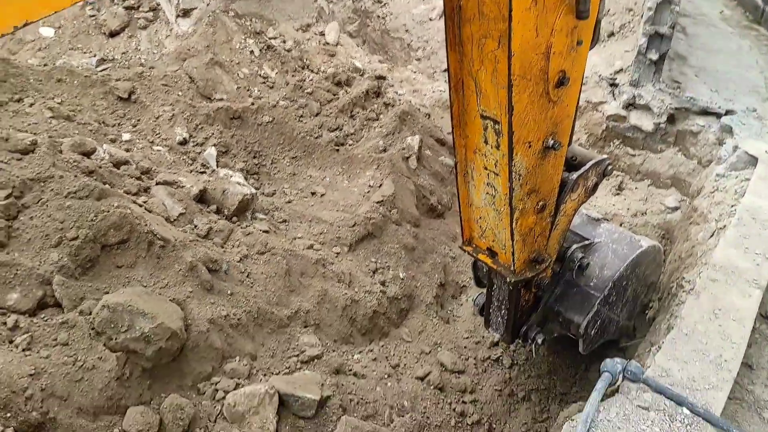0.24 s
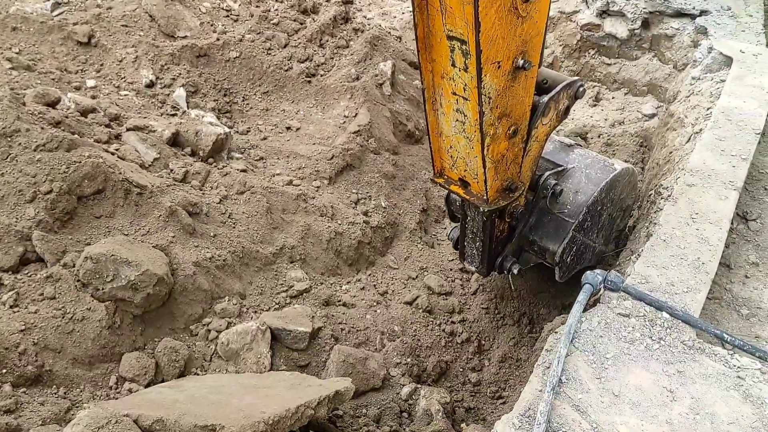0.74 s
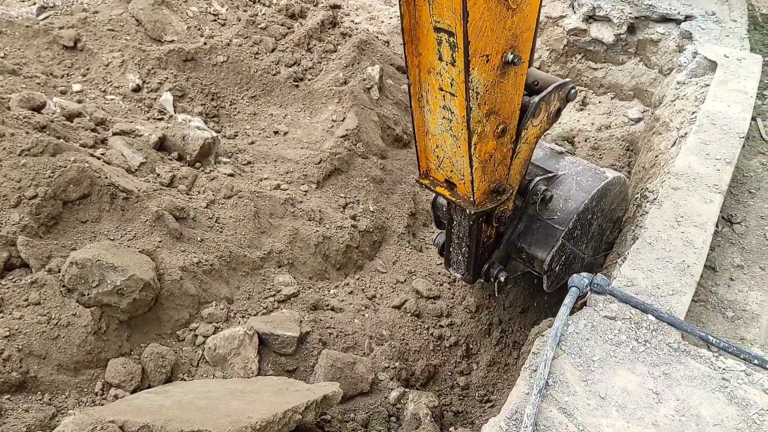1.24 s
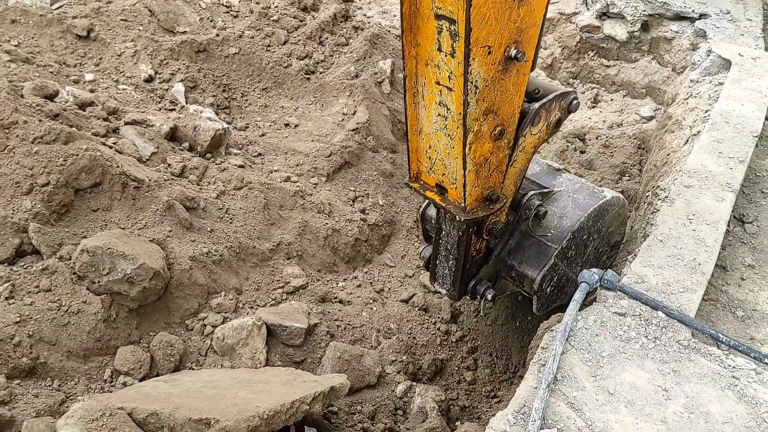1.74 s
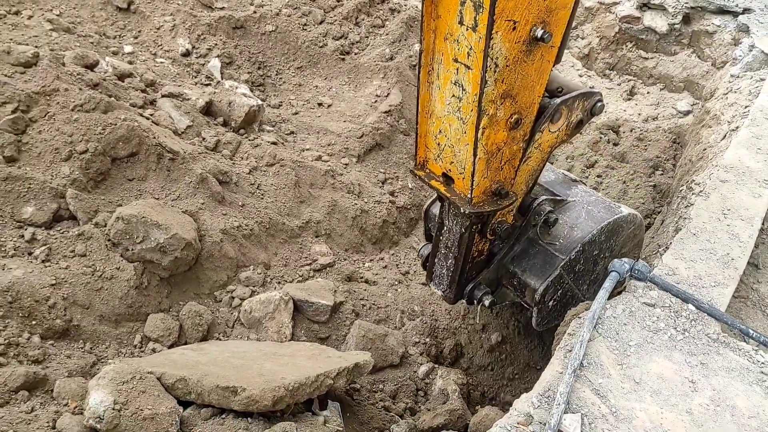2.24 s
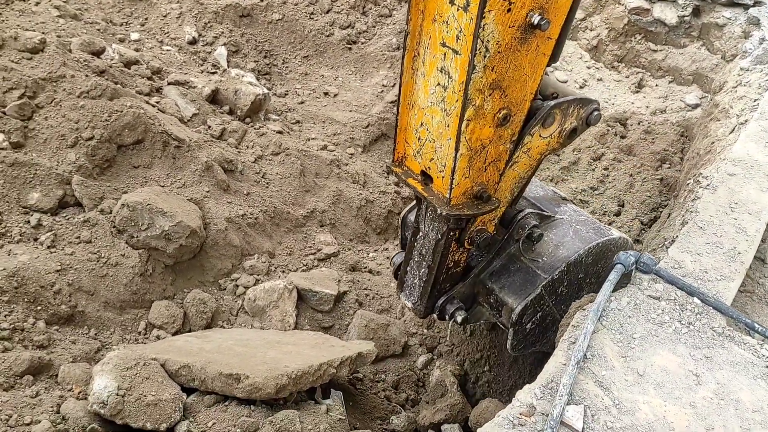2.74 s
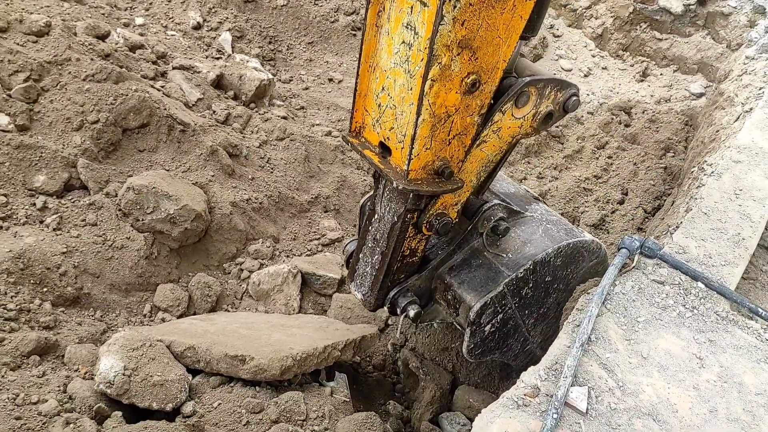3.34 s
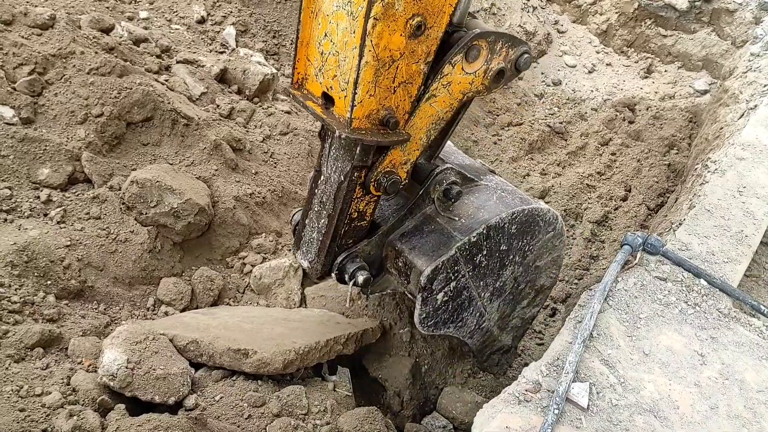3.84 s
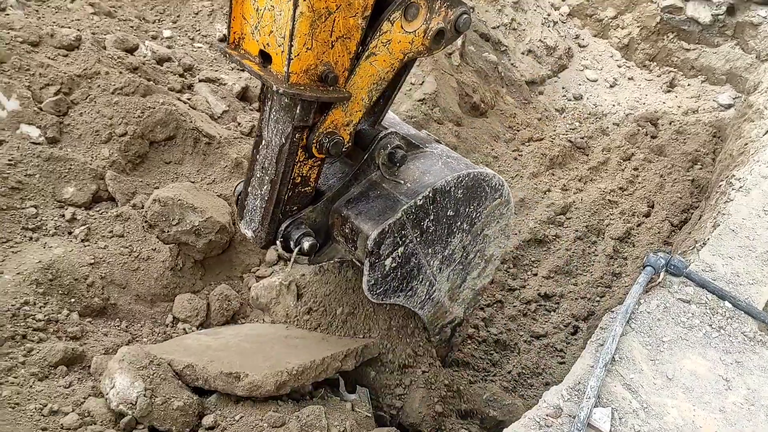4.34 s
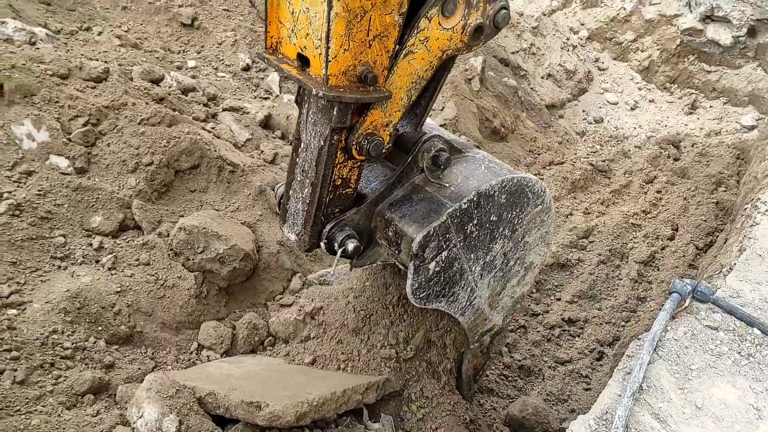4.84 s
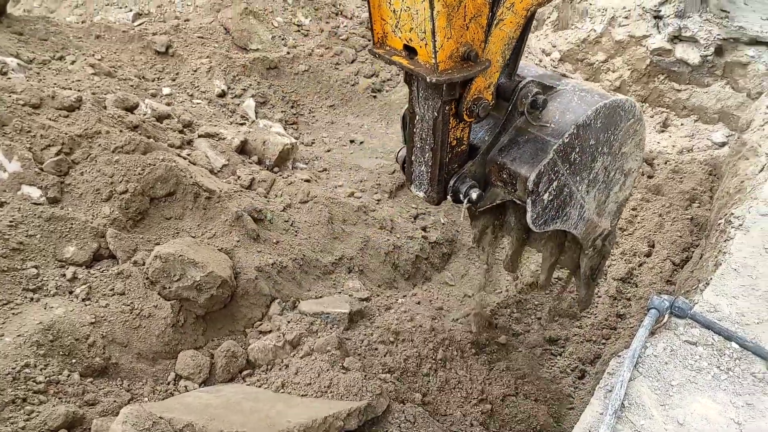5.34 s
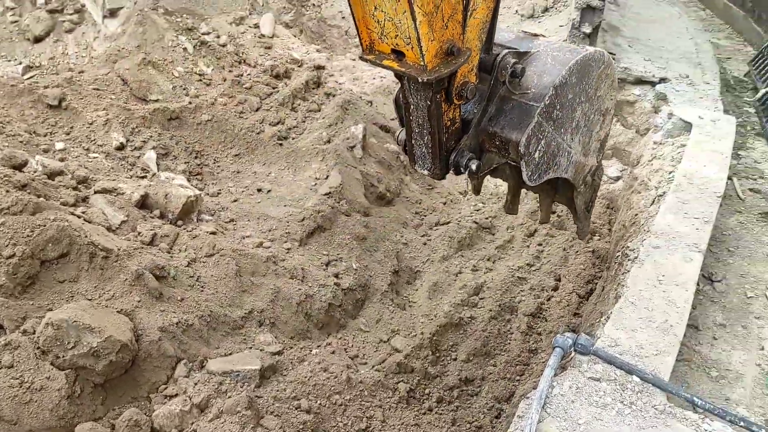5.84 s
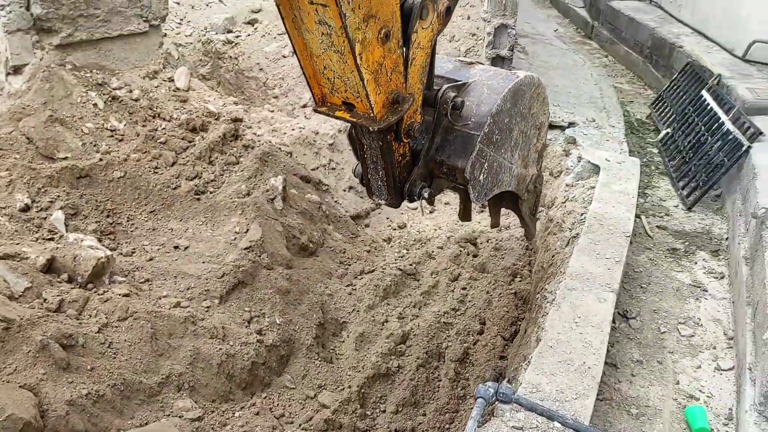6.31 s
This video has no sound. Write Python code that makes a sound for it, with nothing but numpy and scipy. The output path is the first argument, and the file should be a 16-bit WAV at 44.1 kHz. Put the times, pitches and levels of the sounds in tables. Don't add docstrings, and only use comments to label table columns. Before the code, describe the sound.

A diesel engine runs throughout, a low throbbing hum with an uneven exhaust beat, rushing roar and faint fan whistle, heard close in stereo outdoors. From 0 to 1 s the bucket scrapes softly, with soil slumping and small stones ticking while the engine labours. After a brief oil hiss near 1.1 s, engine speed climbs and from 1.5 s a pump whine emerges, swelling about twice a second. Soft thuds and a crunch fall at 1.7-1.9 s; dragging and steel knocks thicken from 2.4 to 3.6 s. A hard rock bang lands at 3.8 s. Between 4.6 and 5.1 s comes the heaviest tumble: ringing cracks, pouring gravel, deep thuds and a boom, loudest near 4.85 s. Knocks thin by 5.4 s, leaving engine, whine and rising hiss from 5.9 s. Bright clanks at 6.15 s and a sharp clang with low booms at 6.5 s close it.

```python
import sys
import numpy as np
from scipy import signal
from scipy.io import wavfile
from scipy.ndimage import uniform_filter1d

SR = 44100
rng = np.random.default_rng(int(sys.argv[2]) if len(sys.argv) > 2 else 0)


def store_wav(level_fs):
    pcm = np.round(np.clip(np.atleast_2d(level_fs), -1, 1) * 32767)
    wavfile.write(sys.argv[1], SR, pcm.T.astype(np.int16))


def invert_db(level):
    return 10 ** (np.asarray(level, dtype=float) / 20)


N = 289737
SIDES = np.array([[1], [-1]])
ENGINE_LAG = 9

# (f/Hz, width/Hz, level/dB)
PLATES = [(1440, 173, -1), (1846, 80, 0.5), (1996, 97, -2), (2158, 60, -1), (2360, 170, 0.5),
          (2790, 160, 0), (3078, 70, -7), (3730, 220, -9), (4026, 70, -4), (4325, 87, -7), (6950, 50, -6.5),
          (6350, 55, -23), (7930, 81, -2.5)]
# (f/Hz, likeness/0-1)
DIRECT = [(100, 1), (300, 1), (700, 0.45), (1200, 0.44), (2500, 0.3), (8000, 0.09)]


def rms_one(x):
    return x / np.sqrt(np.mean(x ** 2) + 1e-20)


def in_time(rows):
    s, *columns = np.transpose(rows)
    return [np.interp(np.arange(N) / SR, s, c) for c in columns]


def at_hz(points, hz):
    table_hz, value = np.array(points)[:, 0], np.array(points)[:, 1]
    return np.interp(np.log(hz), np.log(table_hz), value)


def drift(rate):
    r = np.exp(-80 * np.pi * rate / SR)
    noise = rng.standard_normal(N // 40 + 2002)
    slow = signal.lfilter([1], [1, -2 * r, r * r], noise)[2000:]
    return np.interp(np.arange(N) / 40, np.arange(len(slow)), np.clip(rms_one(slow), -3, 2))


def ring(clicks, hz, t60):
    r = invert_db(-60 / (max(t60, .005) * SR))
    w = 2 * np.pi * hz / SR
    return signal.lfilter([0, np.sin(w)], [1, -2 * r * np.cos(w), r * r], clicks + 1e-18)


def grains(per_s, spread_db):
    chance = rng.random((4, N)) * SR / per_s
    out, hit = np.zeros((4, N)), chance < 1
    size = chance[hit]
    sign = np.where(np.arange(hit.sum()) % 3 % 2, 1, -1) * rng.choice([-1, 1], hit.sum())
    out[hit] = sign * invert_db(spread_db * np.minimum(-np.log(size + 1e-9), 3))
    return rms_one(out).reshape(2, 2, N) + 1e-18


def ports(mid, side, alike, hz):
    # (f/Hz, level/dB)
    left_louder = [(40, 0), (200, 1.5), (700, 3), (2500, 3), (6000, 5.5), (9000, -4), (13000, -9)]
    alike = np.clip(alike, 0, 1)
    tilt = invert_db(at_hz(left_louder, hz) / 2 * SIDES)
    return tilt * (np.sqrt(1 + alike) * mid + np.sqrt(1 - alike) * side * SIDES)


def colour(streams, spectrum, likeness, patchy_db, patch_rate):
    out, together = 0, drift(patch_rate / 4)
    lowest, highest = spectrum[0][0], spectrum[-1][0]
    edges = lowest * 2 ** np.arange(0, np.log2(highest / lowest) + .01, .4)
    for k, (low, high) in enumerate(zip(edges, edges[1:])):
        band = signal.butter(2, [low, high], "band", fs=SR, output="sos")
        mid, side = signal.sosfilt(band, streams[k % 2])
        hz = np.sqrt(low * high)
        gain = invert_db(at_hz(spectrum, hz) + patchy_db * (0.49 * together + drift(patch_rate)))
        out = out + gain * ports(mid, side, at_hz(likeness, hz), hz)
    return rms_one(out)


def lagged(x, count):
    return np.array([np.r_[np.zeros(count), x[0, :N - count]], x[1]])


def governor():
    # (t/s, firings per second/Hz)
    set_point = [(0.0, 34.1), (0.45, 33.9), (0.7, 34.44), (0.9, 34.46), (1.5, 35.55), (1.8, 36.94),
                 (3.2, 36.87), (4.2, 36.61), (6.57, 36.66)]
    surges = [1.36, 1.861, 2.35, 2.87, 3.34, 3.86, 4.34, 4.85, 5.39, 5.98, 6.47, 6.97]
    t = np.arange(N) / SR
    hunt = 2 * np.pi * np.interp(t, surges, np.arange(len(surges)))
    pump = np.clip((t - 1.5) / .14, 0, 1)
    firing_hz = in_time(set_point)[0] + 0.34 * pump * np.cos(hunt)
    idle_db, working_db = -43.5, -31
    whine_db = idle_db + pump * (working_db - idle_db + 2 * np.cos(hunt + 0.28))
    hum_db = -31 + 2.5 * pump * (np.cos(hunt + 0.25) - .3)
    return firing_hz, whine_db, hum_db


def engine():
    # (multiple of half the firing rate, level/dB)
    pattern = [(1, -33), (2, -8), (3, -46), (4, -10.5), (5, -43), (6, -18), (7, -49), (8, -9.5), (9, -7.5),
               (10, -26), (11, -11.5), (12, 0), (13, -7), (14, -10), (15, -22), (16, -20), (17, -26),
               (18, -21), (19, -10.5), (20, -16), (21, -42), (22, -21), (23, -46), (24, -9), (25, -20),
               (26, -22), (30, -19), (35, -13)]
    # (t/s, share/0-1)
    labour = [(0.0, 0.2), (0.25, 0.5), (0.55, 0.85), (0.64, 0.97), (0.73, 0.0), (.84, 0.6), (1.0, 0.89),
              (1.5, 0.92), (1.75, 0.14), (2.0, 0.01), (6.57, 0.0)]
    # (multiple of half the firing rate, free level/dB, labouring level/dB)
    labour_tones = [(2, -37, -30.5), (6, -49.5, -31)]
    # (f/Hz, level per Hz/dB)
    roar_spectrum = [(40, -26), (90, -25.5), (150, -15.5), (230, -9.5), (330, -15.5), (500, -19.5),
                     (800, -22), (1300, -21.5), (2500, -24), (4000, -43), (5500, -31.5), (8000, -29),
                     (9500, -71), (15000, -44)]
    # (f/Hz, likeness/0-1)
    diffuse = [(60, 0.93), (130, 1), (290, 0.99), (640, 0.45), (1200, 0.56), (2500, 0.021), (8000, 0.023)]
    firing_hz, whine_db, hum_db = governor()
    firing_phase = 2 * np.pi * np.cumsum(firing_hz) / SR
    lug, = in_time(labour)
    loaded = {round(k): free_db + lug * (lug_db - free_db) for k, free_db, lug_db in labour_tones}
    loaded[12] = hum_db + 2.5 * np.cos(firing_phase / 4 + 1.3)
    out = 0
    for multiple, level_db in pattern:
        waver = min(multiple / 9.9, 1) * (.45 if multiple % 12 == 0 else 1)
        level_db = loaded.get(multiple, -34 + level_db) + 2.43 * waver * drift(6.3)
        phase = multiple / 2 * firing_phase + rng.uniform(0, 2 * np.pi) + 0.44 * waver * drift(2.25)
        out = out + np.sqrt(2) * invert_db(level_db) * np.sin(phase) * ports(1, 0, 0, multiple * 18)
    whine = np.sin(24 * firing_phase + 0.28 * drift(6.0) + [[-.9], [0]]) * invert_db(whine_db + 1.6 * drift(4.0))
    whine = np.sqrt(2) * whine * invert_db([[2.0], [-1.5]])
    firing = invert_db(0.51 * np.cos(2 * firing_phase) + 0.94 * np.cos(firing_phase / 2))
    noise = rng.standard_normal((2, 2, N))
    roar = colour(noise, roar_spectrum, diffuse, patchy_db=2.0, patch_rate=10.0)
    return lagged(out + whine + invert_db(-29.5) * firing * roar, ENGINE_LAG)


def exhaust():
    cylinder_db = [2.5, -11, -9, -9.5]
    # (f/Hz, level/dB, t60/s)
    pipe = [(227, -2, 0.029), (275, -2, 0.042), (422, -12, 0.027)]
    start = 2.9
    firing = np.floor(np.cumsum(governor()[0]) / SR - start).astype(int)
    at = np.flatnonzero(np.diff(firing))
    beat_db = np.array(cylinder_db)[firing[at + 1] % len(cylinder_db)]
    clicks = np.zeros(N)
    clicks[at] = invert_db(-21 + beat_db + 3 * drift(32.0)[at])
    high_pass = signal.butter(2, 176, "high", fs=SR, output="sos")
    clicks = signal.sosfilt(high_pass, clicks + 1e-18)
    out = sum(invert_db(db) * ring(clicks, hz, t60) * ports(1.0, 0, 0, hz) for hz, db, t60 in pipe)
    return lagged(out, ENGINE_LAG)


def valves(gravel_db):
    # (t/s, level/dB)
    valve_hiss = [(0, -59), (.8, -63), (1.1, -52), (1.4, -61), (1.7, -68), (3, -67), (5.3, -62), (5.6, -63),
                  (5.9, -50), (6.57, -49)]
    band = signal.butter(2, [10800, 15600], "band", fs=SR, output="sos")
    mid, side = rms_one(signal.sosfilt(band, rng.standard_normal((2, N))))
    oil = invert_db(in_time(valve_hiss)[0] + 1.7 * drift(4.4))
    sand = invert_db(gravel_db - 36)
    hiss = np.hypot(oil, sand) * (mid + 0.95 * side * SIDES)
    shroud_hz, shroud_t60 = 5690, 0.0086
    fan = ring(rng.standard_normal((2, N)), shroud_hz, shroud_t60)
    fan = rms_one(ring(fan, shroud_hz, shroud_t60))
    return hiss + invert_db(-45 + 1.2 * drift(2.5)) * fan


def strokes(start, length, level_db, lead_db, rise_db, fall_db, tail_db, settle_db, rest_db):
    t = np.arange(0, N + 32, 32)[:, None] / SR
    early, late = np.maximum(start - t, 0), np.maximum(t - start - length, 0)
    before = (lead_db - rise_db * early) * (early > 0)
    after = invert_db(-2 * fall_db * late) + invert_db(2 * (tail_db - settle_db * late))
    power = invert_db(2 * (level_db + before)) * after
    total_db = 10 * np.log10(power.sum(axis=1) + invert_db(2 * rest_db))
    return np.interp(np.arange(N) / SR, t[:, 0], total_db)


def sliding(soil_db, gravel_db):
    # (f/Hz, level per Hz/dB)
    soil_spectrum = [(80, -26), (160, -1.5), (400, -1.5), (750, -4), (1200, -2.5), (2000, -16), (3500, -20),
                     (6000, -82)]
    gravel_spectrum = [(1200, -36), (2500, 0.5), (4800, -11.5), (6000, 5), (8000, 4), (8700, 0),
                       (9600, -33), (15000, -32)]
    coarse = grains(2000 * invert_db(2.5 * drift(30.0)), spread_db=2.5)
    soil = colour(coarse, soil_spectrum, DIRECT, patchy_db=3.0, patch_rate=24.5)
    fine = grains(12000 * invert_db(2.1 * drift(45.0)), spread_db=1.5)
    gravel = colour(fine, gravel_spectrum, DIRECT, patchy_db=2.0, patch_rate=14.0)
    return invert_db(soil_db) * soil + invert_db(gravel_db + 0.5) * gravel


def grating(level_db):
    slips, out = grains(3500 * invert_db(3.5 * drift(40.0)), spread_db=1.5), 0
    for k, (hz, width_hz, mode_db) in enumerate(PLATES):
        mid, side = ring(slips[k % 2], hz, np.log(1000) / np.pi / width_hz)
        gain = invert_db(mode_db + 2.3 * drift(12.0)) * np.sqrt(width_hz)
        out = out + gain * ports(mid, side, at_hz(DIRECT, hz), hz)
    return invert_db(level_db - 3) * rms_one(out)


def struck(times, level_db, modes, chatter_s, port_db=2.2):
    out, count = np.zeros((2, N)), len(times)
    for hz, mode_db, t60 in modes:
        delays = rng.random((count, 3)) * [0, 1, 1] * chatter_s
        sizes = rng.normal(0, 1.84, (count, 3)) - [0, 4.0, 8.0]
        at = np.minimum(((times[:, None] + delays) * SR).astype(int), N - 1)
        uneven = rng.normal(0, port_db, (2, count, 1))
        clicks = np.zeros((2, N))
        clicks[:, at] = invert_db(level_db[:, :, None] + mode_db + sizes + uneven)
        out += ring(clicks, hz, t60)
    return out


def pings():
    # (t/s, peak level/dB, f/Hz, t60/s)
    short_notes = [(0.162, -17.5, 395, 0.059), (0.44, -26, 680, 0.063), (0.469, -25, 666, .07),
                   (0.545, -17.5, 684, 0.072), (0.58, -17.5, 404, 0.085), (0.645, -18, 800, 0.065),
                   (0.699, -22.5, 346, 0.089), (1.4, -10, 1155, 0.045), (2.2, -20, 1190, .04),
                   (1.88, -23, 1830, .03), (3.835, -9, 430, 0.046), (3.836, -15, 1490, 0.029),
                   (5.9, -14, 1540, .05), (4.2, -11.5, 1400, .04), (4.598, -6.5, 3000, 0.036),
                   (4.602, -14, 1930, 0.044), (4.2, -15, 603, 0.031), (5.2, -16.5, 2020, 0.07),
                   (5.05, -15.5, 2150, 0.076), (6.4733, -10.5, 3780, 0.021), (7.4, -14, 1350, .04),
                   (6.484, -5, 2930, 0.054), (6.484, -19, 2700, 0.03), (6.486, -22, 4310, 0.057),
                   (4.812, -11.5, 7700, 0.12), (4.83, -14, 7000, .08), (4.648, -23, 2900, .06),
                   (3.516, -21, 2000, 0.03), (1.6, -23, 4060, .04), (5.0, -21, 2000, 0.05),
                   (4.7, -19, 1900, .04), (4.855, -13.5, 135, 0.19), (4.62, -12, 182, 0.12),
                   (4.4, -17, 1100, .06), (4.863, -12, 2400, .05), (4.599, -17.5, 4500, 0.027),
                   (4.852, -13, 6900, .03), (6.476, -24, 6500, .03), (5.055, -19.5, 3600, 0.076),
                   (0.19, -16.5, 404, .05), (0.205, -22, 300, .06), (1.4, -14, 410, 0.035),
             (1.861, -13, 310, .06), (1.885, -16, 730, .04), (1.886, -17, 350, 0.045),
             (1.7, -12.5, 390, .06), (1.92, -21, 240, 0.068), (1.5, -19, 310, .05), (2.124, -20, 280, .06),
             (2.47, -18.5, 300, 0.066), (2.51, -20, 436, 0.068), (3.864, -9, 514, 0.059),
             (3.875, -16, 290, .06), (4.645, -14, 225, .08), (4.738, -16, 200, 0.07),
             (5.2, -14, 210, 0.091), (4.80, -17, 188, 0.077), (4.875, -9, 257, 0.054),
             (4.888, -16, 640, .04), (4.805, -28, 10400, .1), (4.81, -32, 13900, .1),
             (4.84, -36, 13000, .06), (6.153, -16, 2210, .04), (6.8, -22, 8000, .02),
             (3.835, -9, 6500, .025), (3.60, -16.5, 2250, 0.047), (3.2, -20.5, 2400, .04),
             (6.49, -34, 15000, .15), (4.767, -16, 890, 0.058), (4.844, -4, 300, .05),
             (4.596, -12, 2050, .03), (6.474, -12, 2250, .03), (6.474, -14, 900, .03),
             (5.25, -17, 150, .15), (1.955, -19, 960, .05)]
    out = np.zeros((2, N))
    for s, db, hz, t60 in short_notes:
        level_db = db + 1.2 * SIDES
        out += struck(np.array([s]), level_db, [(hz, 0, t60)], chatter_s=0.004, port_db=1.5)
    return out


def thuds():
    # (t/s, peak level/dB, main f/Hz, t60/s)
    rocks = [
        (1.686, -16, 260, 0.07),
        (1.838, -14, 340, 0.08),
        (3.8345, -3.5, 520, 0.063),
        (4.621, -4, 240, 0.08),
        (4.752, -8.5, 167.9, 0.4),
        (4.842, -1.5, 284.6, 0.09),
        (4.899, -18, 273, 0.2),
        (5.059, -12.5, 211, 0.094),
        (6.483, -11, 198.5, 0.15),
        (6.553, -13, 199, 0.15),
    ]
    # (f/Hz, level/dB, t60/s)
    belly = [(113, -42, 0.17), (155, -11, 0.39), (299, 3, 0.17), (469, -3, 0.16), (560, -21, 0.065),
             (830, -20, .08)]
    s, peak_db = np.transpose(rocks)[:2]
    level_db = peak_db + 1.1 * SIDES
    out = struck(s, level_db - 17.5, belly, chatter_s=0.021)
    for k, (_, _, hz, t60) in enumerate(rocks):
        out += struck(s[k:k + 1], level_db[:, k:k + 1] - 10.5, [(hz, 0, t60)], chatter_s=0.0118)
    return out


def knocks():
    # (t/s, peak level/dB, dull part relative level/dB, left minus right/dB)
    blows = [(0.437, -24, 5, 0), (0.546, -30, 8, 3), (0.637, -24, -7, -2), (0.942, -24, 7, -2),
             (1.688, -33, 6, 14), (1.8352, -17, -14, -4), (1.8796, -18, -6, -2), (2.4316, -17, 2, 9),
             (2.9312, -11, -6, 1), (3.0708, -11, -9, -1), (3.1837, -22, -4, 13), (3.2794, -11.5, -14, 2),
             (3.3335, -11.5, -5, 2), (3.4139, -15, -7, 0), (3.5174, -14, -20, 3), (3.5955, -6, -15, -1),
             (3.8345, -6, -10, 4), (3.8591, -8.5, 1, -5), (4.3355, -21, -6, 2), (4.571, -7, -18, 4),
             (4.5963, -2.5, -10, 6.5), (4.8539, -6, -14, -8), (4.8625, -5, -13, 3), (5.03, -17, -13, 3),
             (5.1243, -10.5, -1, 2), (5.19, -9, -11, 2), (5.3418, -9.5, -19, 7), (6.152, -4, -29, 5.5),
             (6.2088, -8, -17, 6), (6.4738, 1, -17, 16), (6.4844, -6, -14, -5)]
    # (f/Hz, level/dB, t60/s)
    snap_modes = [(1177, 0, 0.015), (2250, 1, 0.013), (3830, -2, 0.012)]
    dull_modes = [(717, 3.5, 0.055), (1171, 2, 0.094), (1480, -1, 0.075)]
    s, peak_db, dull_db, pan_db = np.transpose(blows)
    level_db = peak_db + pan_db / 2 * SIDES
    steel_modes = [(hz, mode_db, 4.4 / width_hz) for hz, width_hz, mode_db in PLATES]
    crack_modes = [(hz, .1, .03) for hz in (5740, 6550, 7640, 7800, 8400)]
    steel = struck(s, level_db - 23.0, steel_modes, chatter_s=.008)
    crack = struck(s, level_db - 27, crack_modes, chatter_s=0.0089)
    snap = struck(s, level_db - 14.5, snap_modes, chatter_s=0.0028)
    dull = struck(s, level_db + dull_db - 14.5, dull_modes, chatter_s=0.031)
    return steel + crack + snap + dull


def scene():
    # (t/s, length/s, gravel level/dB, steel relative level/dB)
    scrapes = [(0.135, 0.08, -25, 2), (0.303, 0.22, -41, 10), (.53, 0.029, -37, 9),
               (0.617, 0.078, -37, 12.5), (0.927, 0.062, -38, 10), (1.832, 0.067, -24.5, 0),
               (2.25, 0.13, -38.5, 8), (2.427, 0.094, -29.5, 6.5), (2.712, 0.029, -40, 12),
               (2.924, 0.15, -31, 8.5), (3.181, 0.014, -27.5, 2), (3.277, 0.051, -37, 9.5),
               (3.525, 0.14, -25.5, 6), (3.705, 0.093, -22, 0.5), (3.833, 0.028, -19, 4.5),
               (4.198, 0.13, -27.5, 7), (4.51, 0.055, -31, 5), (4.592, 0.011, -26, 17),
               (4.64, 0.05, -19.5, -8), (4.751, 0.047, -24.5, 9), (4.812, 0.017, -13.5, -18),
               (4.841, 0.02, -16, 4.5), (4.986, 0.071, -20.5, 4), (5.135, 0.065, -28, 9),
               (5.326, 0.028, -30.5, 2), (6.144, 0.018, -27, -7), (6.198, 0.029, -27.5, -1),
               (6.285, 0.18, -30, 0.5), (6.481, 0.021, -23, 9), (6.512, 0.09, -21.5, 3.5)]
    # (t/s, length/s, level/dB)
    slumps = [(0, 0.014, -25), (0.148, 0.07, -22), (0.424, 0.071, -28.5), (0.534, 0.023, -27.5),
              (0.63, 0.061, -23.5), (0.95, 0.096, -33), (1.695, 0.013, -24.5), (1.832, 0.09, -22),
              (2.302, 0.25, -27.5), (2.713, 0.019, -35), (2.935, 0.12, -28), (3.194, .03, -33),
              (3.564, 0.098, -27), (3.716, 0.094, -20), (3.836, 0.02, -15), (4.223, 0.16, -30),
              (4.5, 0.028, -23), (4.609, 0.044, -18), (4.772, 0.012, -17.5), (4.849, 0.021, -14),
              (4.973, 0.11, -35), (5.216, 0.12, -41), (6.166, .02, -32), (6.48, 0.07, -28.5),
              (6.553, .05, -19)]
    s, length, level_db, steel_db = np.transpose(scrapes)
    shape = dict(lead_db=-9, rise_db=417, fall_db=278, tail_db=-13, settle_db=60)
    steel_db = strokes(s, length, level_db + steel_db, **shape, rest_db=-39)
    gravel_db = strokes(s, length, level_db, **shape, rest_db=-35.5)
    soil_db = strokes(*np.transpose(slumps), lead_db=-7, rise_db=364, fall_db=228,
                      tail_db=-13, settle_db=51, rest_db=-39)
    high_pass = signal.butter(2, 80, "high", fs=SR, output="sos")
    rocks = signal.sosfilt(high_pass, thuds() + pings())
    bucket = grating(steel_db) + sliding(soil_db, gravel_db) + knocks() + rocks
    heavy = signal.lfilter(*signal.butter(1, 1000, fs=SR), bucket)
    digging = lagged(bucket - heavy, 21) + lagged(heavy, 9)
    return engine() + exhaust() + valves(gravel_db) + digging


def emptied(x):
    # (f/Hz, share of the time/0-1)
    silent_share = [(750, 0), (1100, .07), (2000, .09), (3400, .17), (6500, .14), (8300, .15), (8900, .34),
                    (9700, .65), (14800, .68), (15300, .87), (15500, .999)]
    # (f/Hz, height/Hz)
    gap_height = [(1000, 90), (3000, 150), (8500, 170), (10000, 330)]
    size, first = 1024, 138
    n, k = np.arange(2 * size), np.arange(size) + .5
    window = signal.windows.kaiser_bessel_derived(2 * size, 4 * np.pi)[:, None]
    basis = window * np.cos(np.pi / size * np.outer(n + .5 + size / 2, k))
    lead, count = 2 * size - first, N // size + 4
    blocks = np.pad(x, ((0, 0), (lead, count * size - N - lead))).reshape(2, count, size)
    z = np.concatenate([blocks[:, :-1], blocks[:, 1:]], axis=2) @ basis
    hz = k * SR / 2 / size
    band = np.cumsum(SR / 2 / size / at_hz(gap_height, hz)).astype(int)
    short, long = rng.standard_normal((2, count - 1, band[-1] + 1))
    field = rms_one(uniform_filter1d(short, 3, axis=0)) + rms_one(uniform_filter1d(long, 7, axis=0)) / 2
    power = uniform_filter1d(np.sum(z ** 2, axis=0), 7)
    level = np.log(uniform_filter1d(power, 3, axis=0) + 1e-16)
    middle = np.minimum(np.searchsorted(band, band) + 3, size - 1)
    valley = np.clip(level - uniform_filter1d(level, 40), -2, 2)[:, middle]
    field = field[:, band] + 1.5 * valley
    rank = np.sort(field.ravel())[(at_hz(silent_share, hz) * field.size).astype(int)]
    frames = (z * (field >= rank)) @ basis.T * 2 / size
    joined = frames[:, 1:, :size] + frames[:, :-1, size:]
    return joined.reshape(2, -1)[:, lead - size:lead - size + N]


def band_limit(x):
    return signal.sosfilt(signal.butter(12, 15460, fs=SR, output="sos"), x)


def record(dry):
    rounded = .95 * np.tanh(dry / .95)
    return band_limit(emptied(rounded))


dry = scene()
out = record(dry)
store_wav(out)
```